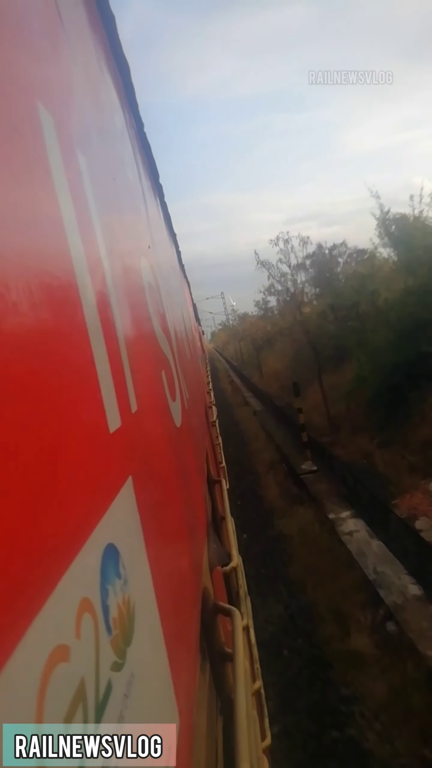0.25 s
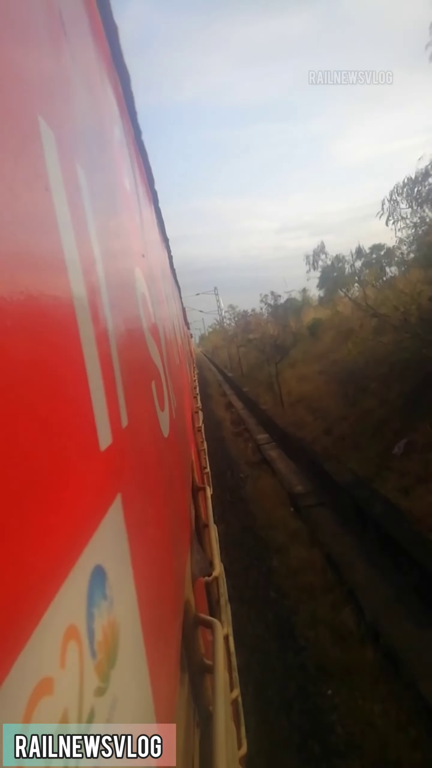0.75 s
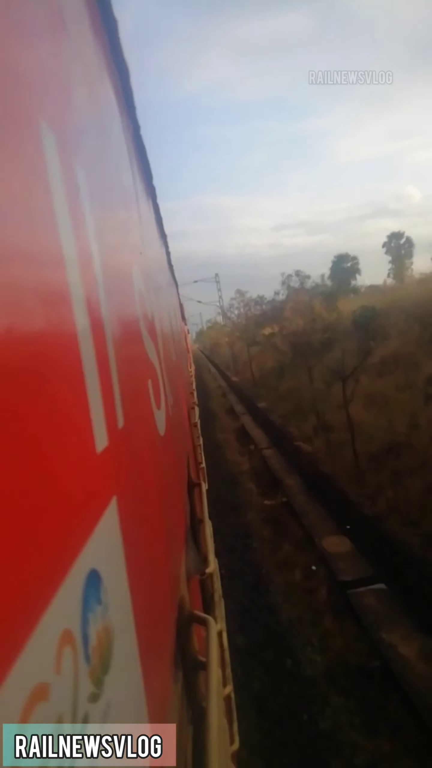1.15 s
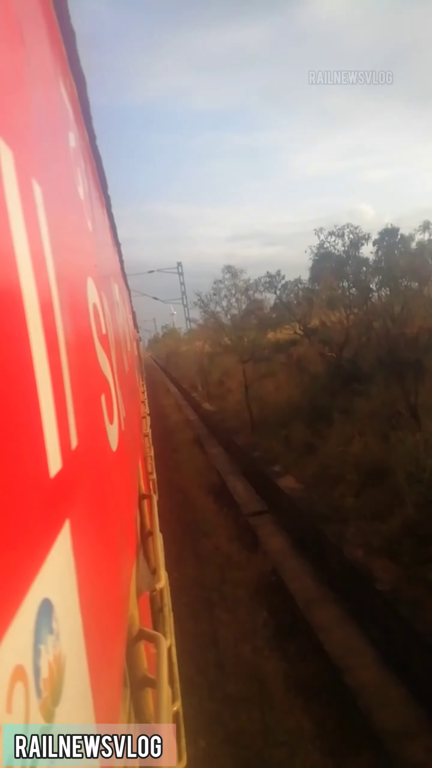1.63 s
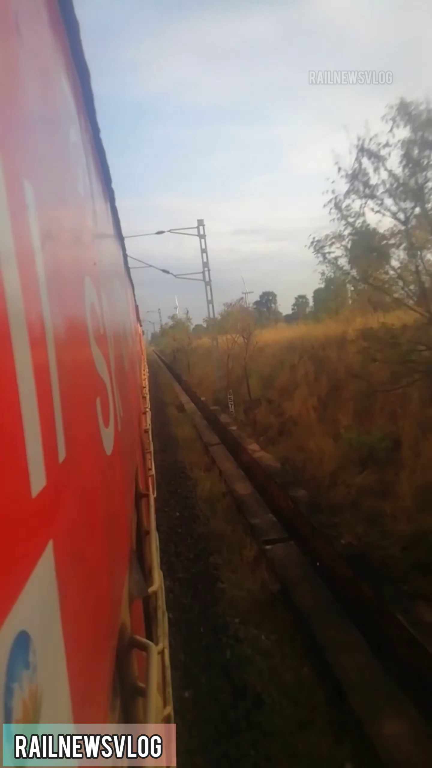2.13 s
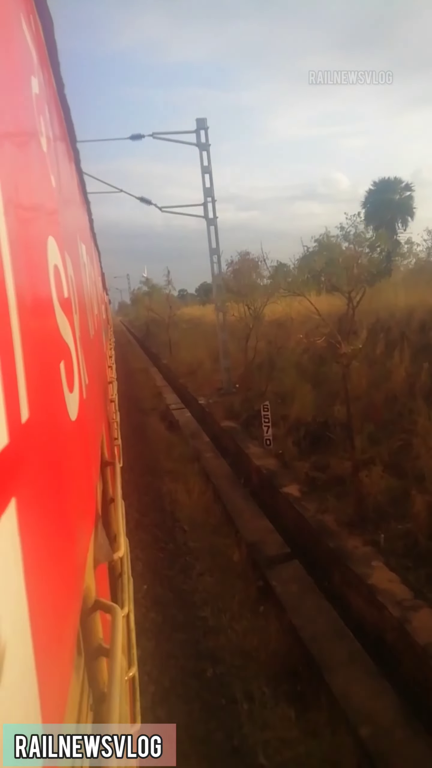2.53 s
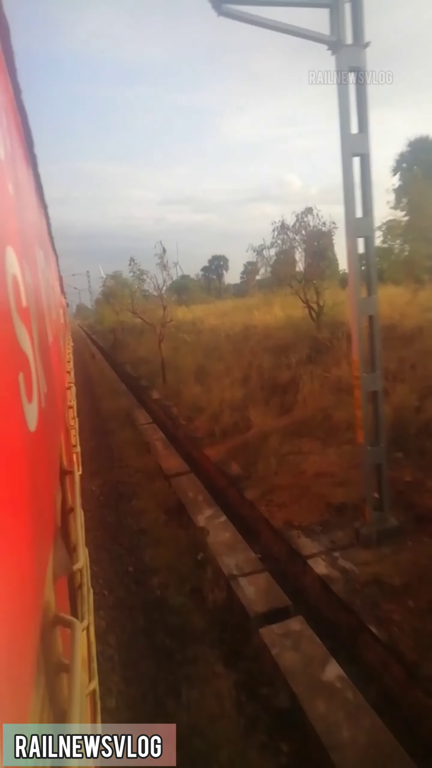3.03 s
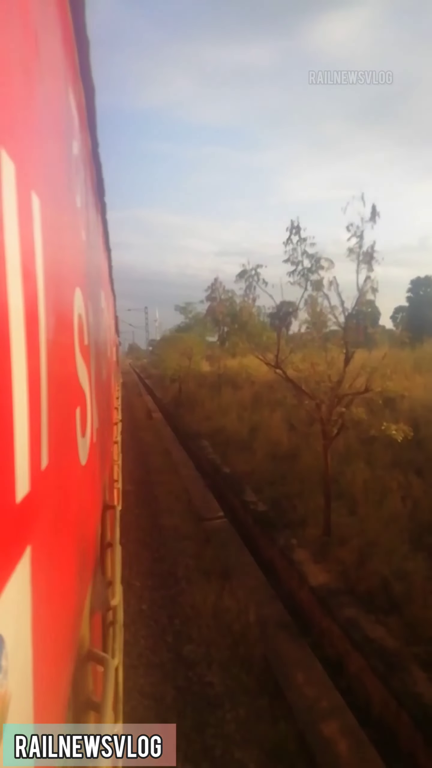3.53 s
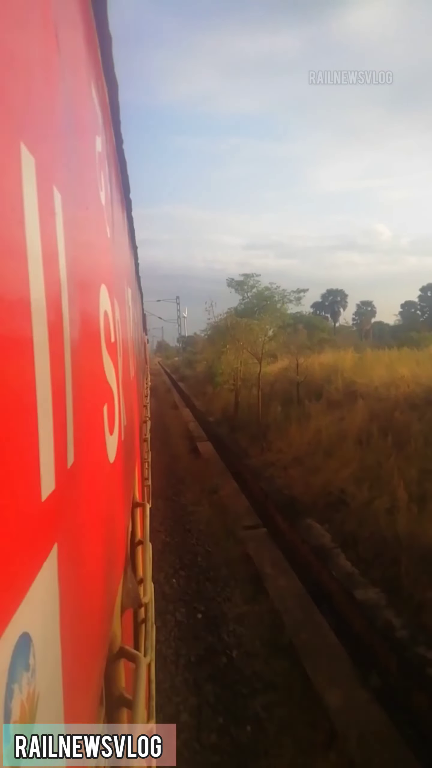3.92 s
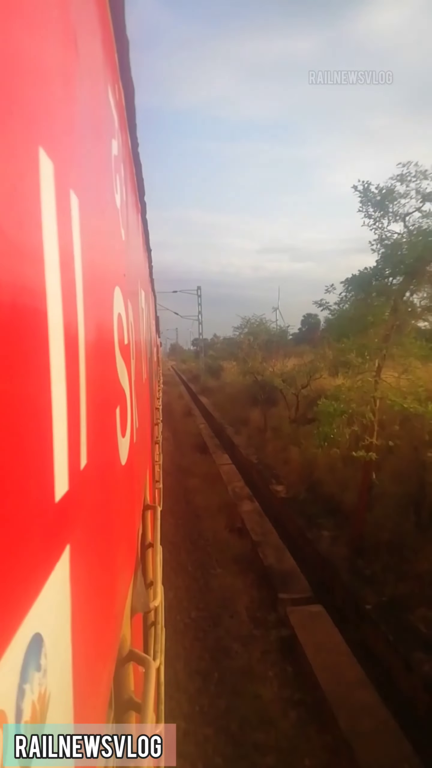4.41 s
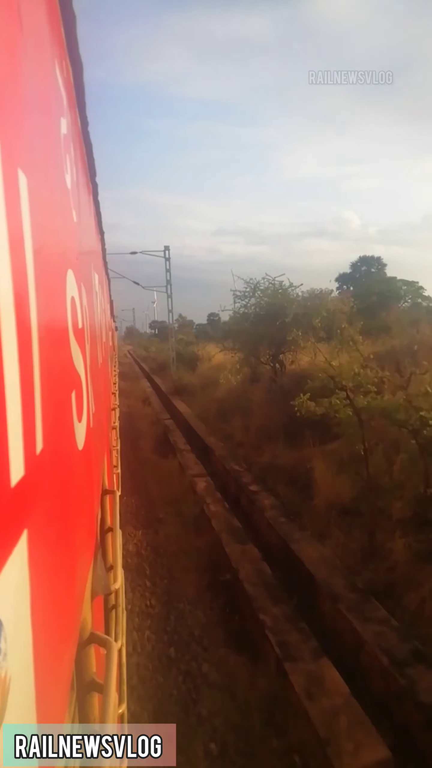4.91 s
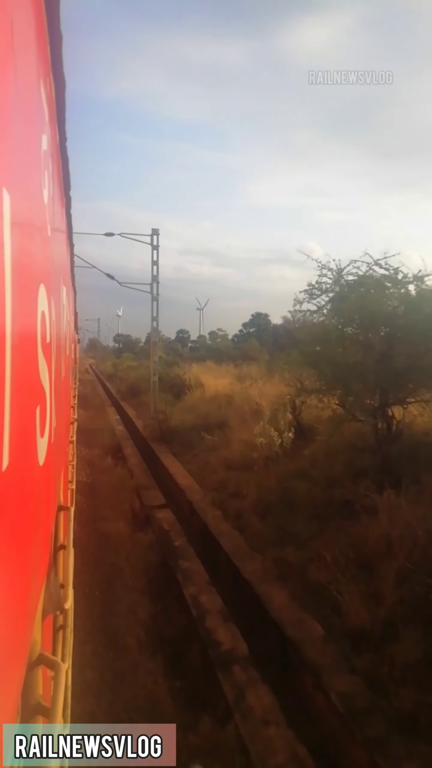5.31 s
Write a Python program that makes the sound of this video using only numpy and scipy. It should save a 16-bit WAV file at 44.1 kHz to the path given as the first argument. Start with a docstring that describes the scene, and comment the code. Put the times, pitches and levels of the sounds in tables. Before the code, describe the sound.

Continuous slipstream noise hits the bare microphone: deep pressure thuds, dense crackling, irregular pops and small treble ticks. It begins left-heavy, with only a dull leak at the right, then turns wide and fuller after a second and a half. Wheel and rail hiss stays thin underneath, dipping and recovering, as the train runs through open country to the end.

```python
"""Wind buffets and crackles at the left, over wheels hissing on the rails: a phone is held out of a train window.
Its right microphone port joins in from about 1.6 s, when the phone turns into the wind.
The wind is shaped noise and random pressure jumps, with slow swings, placed pops and treble snaps on top.
The hiss is shaped noise with a duct whistle at the left. The phone leaks each port, late and dull, into the
other channel and holds the level down with a limiter."""
import sys
import numpy as np
from scipy.fft import rfft, irfft, next_fast_len
from scipy.io import wavfile
from scipy.ndimage import uniform_filter1d, minimum_filter1d, map_coordinates

SR = 44100
rng = np.random.default_rng(int(sys.argv[2]) if len(sys.argv) > 2 else 0)


def wav_out(sig):
    """Save sig, one row per channel (or a flat mono array), as 16-bit PCM at SR to the path in sys.argv[1]."""
    wavfile.write(sys.argv[1], SR, np.round(np.clip(np.atleast_2d(sig).T, -1, 1) * 32767).astype(np.int16))


N = 245195


def amp(db):
    """Gain of a dB value."""
    return 10 ** (np.asarray(db) / 20)


def unit(x):
    """x at rms 1."""
    return x / np.sqrt(np.mean(x ** 2) + 1e-20)


def noise():
    """White noise as long as the scene."""
    return rng.standard_normal(N)


def curves(rows):
    """One value per sample for each column after the time."""
    times, *columns = np.transpose(rows)
    return [np.interp(np.arange(N) / SR, times, column) for column in columns]


def wobble(rate):
    """A smooth random curve with this many knots a second."""
    knots = rng.standard_normal(int(N * rate / SR) + 4)
    return map_coordinates(knots, [np.arange(N) * rate / SR])


def filtered(x, response):
    """x times a complex response of frequency, padded so that the end does not wrap round."""
    m = 2 * next_fast_len(N // 2 + SR // 4)
    return irfft(rfft(x, m) * response(np.fft.rfftfreq(m, 1 / SR)), m)[..., :N]


def coloured(x, spectrum):
    """x through the causal (minimum-phase) filter with this spectrum, so that nothing sounds before a jump."""
    f, db = np.transpose(spectrum)

    def response(hz):
        log_gain = np.interp(np.log(hz + 1), np.log(f + 1), db) * np.log(10) / 20
        cepstrum = irfft(log_gain)
        half = len(cepstrum) // 2
        # fold the mirrored half forward in time
        cepstrum[1:half] *= 2
        cepstrum[half + 1:] = 0
        return np.exp(rfft(cepstrum))
    return filtered(x, response)


def even(x, seconds):
    """x without its own slow level changes, so that a curve alone sets the swells."""
    size = round(seconds * SR)
    power = uniform_filter1d(uniform_filter1d(x ** 2, size=size), size=size // 3)
    return unit(x / np.sqrt(np.abs(power) + 1e-20))


def swells(rows, rise, fall, rounding=1):
    """dB changes that build up to their moment and die away; rounding 1 is pointed, 2 bell-shaped."""
    t = np.arange(0, N + 64, 64) / SR  # a coarse grid is enough
    db = np.zeros(len(t))
    for s, gain, length in rows:
        side = length * np.where(t < s, rise, fall)
        db += gain * np.exp(-(np.abs(t - s) / side) ** rounding)
    return np.interp(np.arange(N) / SR, t, db)


def eddies(rate, spread_db, upward):
    """Random pressure jumps as eddies burst on a port: many small, few large; a share of them push upward."""
    happens, scale, way = rng.random((N, 3)).T
    size = np.minimum(amp(-spread_db * np.log(1 - scale)), 4.5)
    return (happens < rate / SR) * size * np.where(way < upward, 1, -1)


# In all tables split by port, the left port comes first.
# How hard the slipstream bears on each port between puffs, before the layer trims:
# (time [s], buffet level [dB], crackle level [dB])
WIND = [
    [(0, -15, -23), (.5, -16, -25), (.9, -14.5, -26), (1.3, -15.5, -22.5), (1.55, -14, -26.5),
     (1.69, -15, -22.5), (2.1, -17, -26), (2.48, -14.5, -23.5), (2.62, -17.5, -25.5), (3.0, -17, -26.5),
     (3.4, -15.5, -24.5), (3.7, -14, -24.5), (4.1, -19.5, -24.5), (4.3, -13, -20), (4.37, -28, -28),
     (4.45, -15, -26), (4.9, -17.5, -25), (5.2, -12.5, -21.5), (5.56, -17.5, -26.5)],
    [(0, -26, -39), (.46, -26, -40), (1.37, -30, -40), (1.54, -28, -37), (1.6, -13, -31),
     (1.75, -18.5, -19.5), (2.1, -19.5, -17.5), (2.42, -22, -22.5), (2.62, -15, -20.5), (2.9, -15, -25),
     (3.0, -18, -18.5), (3.14, -16, -19), (3.38, -19, -24.5), (3.55, -23.5, -21.5), (3.67, -17, -30),
     (4.13, -16, -27), (4.5, -16, -25.5), (4.86, -23.5, -29), (5.56, -16.5, -24.5)],
]
# Puffs that hit each port: (time [s], crackle change from the steady wind [dB], length [s])
PUFFS = [
    [(0.02, 8, 0.044), (.16, 2, 0.07), (.29, 5, 0.037), (.43, 7.5, 0.023), (.6, 4, 0.068), (.723, 3, 0.013),
     (.77, 5, 0.13), (.973, 2, 0.011), (1.03, 5, 0.018), (1.21, 2.5, 0.012), (1.41, 5.5, 0.026),
     (1.58, 12, 0.021), (1.74, -1, .09), (1.95, 6, 0.049), (2.23, -1, 0.075), (2.36, 1.5, 0.084),
     (2.5, 4, 0.033), (2.67, -2, .05), (3.123, 8, 0.039), (3.28, 4, 0.059), (3.5, 13.5, 0.028),
     (3.56, 0.5, .03), (3.625, 9, 0.017), (3.92, 13, 0.0097), (4.015, 6, 0.022), (4.062, 14.5, 0.031),
     (4.045, 5.5, 0.023), (4.11, 6, 0.011), (4.165, -1, 0.012), (4.57, 14.5, 0.025), (4.71, 4.5, 0.052),
     (4.875, 4, 0.018), (5.06, 1.5, 0.045), (5.17, 2, .015), (5.258, 6, 0.015), (5.3, 9, 0.019),
     (5.42, 6.5, 0.067), (5.52, 4, 0.27)],
    [(1.57, 10, 0.046), (1.9, 5.5, 0.036), (2.03, 7, 0.022), (2.27, 8, 0.022), (2.32, 2.5, 0.04),
     (2.37, 12, 0.031), (2.11, 2, 0.028), (2.18, 4, .015), (2.5, 7, 0.039), (2.57, 7, 0.016),
     (2.74, 7.5, 0.019), (2.87, 5.5, 0.027), (3.193, 4.5, 0.011), (3.275, 14, 0.018), (3.332, 10, 0.008),
     (3.42, 6.5, 0.025), (3.48, 7, 0.04), (3.76, 7.5, 0.061), (3.93, 9, 0.039), (4.06, 9, 0.05),
     (4.2, 9.5, 0.02), (4.325, 6.5, 0.017), (4.42, 6, 0.023), (4.58, 8, 0.023), (4.65, 7, 0.066),
     (4.92, 6, .03), (4.98, 2, 0.048), (5.073, 13, 0.0094), (5.17, 16, 0.0081), (5.26, 8.5, 0.045)],
]
# Brief lulls in which the flow lets go: (time [s], crackle change from the steady wind [dB], length [s])
LULLS = [
    [(.055, -9, 0.02), (.2, -8, 0.022), (.25, -0.5, 0.018), (.354, -5, 0.021), (.39, -4, 0.017),
     (.913, -3.5, 0.027), (1.132, -2, .01), (1.237, -18, 0.013), (1.307, -7, 0.024), (1.696, -12, .025),
     (1.93, -6, 0.023), (2.205, -9, 0.028), (2.345, -7, 0.011), (2.434, -5, .015), (2.624, -8, .03),
     (2.893, -11, .015), (3.223, -9, 0.023), (3.377, -1, 0.013), (3.9, -4, .015), (3.96, -12, 0.018),
     (3.986, -12, 0.011), (4.088, -7, 0.016), (4.13, -7, 0.023), (4.844, -9, 0.023), (5.19, -7, .02),
     (5.368, -9, .02)],
    [(1.69, -16, 0.024), (1.876, -6, 0.013), (1.94, -9, 0.043), (2.205, -7, 0.026), (2.434, -6, 0.017),
     (2.624, -11, 0.01), (2.913, -5, 0.017), (3.073, -9, 0.0095), (3.253, -7, 0.037), (3.382, -5, 0.022),
     (3.452, -22, 0.022), (3.672, -6, .025), (4.085, -5, .015), (4.136, -9, 0.023), (4.265, -4, .015),
     (4.37, -17, 0.018), (5.093, -7, .012), (5.368, -5, 0.033)],
]
# Tone of the low buffeting at each port: (frequency [Hz], gain [dB])
BUFFET = [
    [(50, -31.5), (110, 1.5), (200, -1.5), (400, -8), (800, -21.5), (1500, -62.5)],
    [(40, -19.5), (110, -5), (250, 0), (400, -5.5), (800, -15), (1500, -59)],
]
# Tone of the crackle at each port: (frequency [Hz], gain [dB])
CRACKLE = [
    [(20, -43), (200, -2), (500, 2.5), (1200, -5.5), (2000, -9.5), (3000, -13), (4000, -23), (5500, -25.5),
     (7500, -60), (10000, -77), (16000, -89)],
    [(20, -57.5), (200, -2.5), (500, 2.5), (1200, -2.5), (2000, -9), (3000, -16.5), (4000, -26.5),
     (5500, -25.5), (8000, -34), (10000, -92), (16000, -100)],
]
BUFFET_SHARE = 0.39  # buffet dB gained per crackle dB in a puff or lull


def port_wind(port, upward, roar, choppy):
    """Buffeting and crackle on one port: small eddies burst sharply, large ones are smeared over 0.4 ms."""
    buffet_db, crackle_db = curves(WIND[port])
    puff_db = swells(PUFFS[port], rise=0.69, fall=0.56) + swells(LULLS[port], rise=0.57, fall=0.44)
    buffet_db = buffet_db + BUFFET_SHARE * puff_db
    crackle_db = crackle_db + puff_db
    flutter = choppy * wobble(45)  # shared, so that all layers gust together

    buffet = amp(1.55 * flutter + 2.6 * wobble(18)) * coloured(noise(), BUFFET[port])
    buffet = even(buffet, 0.11)

    small = amp(2.7 * flutter + 2.7 * wobble(110)) * eddies(1300, spread_db=4, upward=upward)
    large = amp(2 * flutter) * uniform_filter1d(eddies(450, spread_db=3.5, upward=upward), size=17)
    rush = amp(3.2 * flutter + 4.1 * choppy * wobble(160)) * noise()
    crackle = unit(small) + 0.57 * unit(large) + roar * unit(rush)
    crackle = even(coloured(crackle, CRACKLE[port]), 0.034)
    return amp(buffet_db + 0.67) * buffet + amp(crackle_db + 3.5) * crackle


def slipstream():
    """Steady wind: choppy and spiky on the left port, more of an even roar on the right."""
    left = port_wind(0, upward=.75, roar=0.43, choppy=1.7)
    right = port_wind(1, upward=.55, roar=0.72, choppy=0.91)
    return np.array([left, right])


# Slow pressure swings between surges, as heard at the left port: (time [s], level [dB])
HEAVE = [(0, -20), (.7, -18), (1.2, -17.5), (1.7, -20.5), (2.1, -21.5), (3.4, -20.5), (4.4, -24),
         (5.56, -20)]
# Surges of the swings: (time [s], change from the steady swings [dB], length [s])
SURGES = [(.11, 8, 0.037), (.335, 10, 0.13), (.55, 7, 0.067), (.8, 5, 0.038), (1.05, 4, 0.057),
          (1.35, 7, 0.12), (1.56, 3, 0.059), (1.73, 9.5, 0.055), (2.0, 4, 0.027), (2.2, 7, 0.13),
          (2.53, 8.5, 0.14), (2.86, 5.5, 0.13), (3.05, 7, 0.041), (3.48, 9.5, 0.16), (3.77, 9, 0.036),
          (3.98, 5, 0.02), (4.26, 10.5, 0.19), (4.55, 7.5, 0.089), (4.75, 9.5, 0.034), (4.85, 9, 0.031),
          (5.0, 13, 0.16), (5.25, 7.5, 0.033), (5.46, 7.5, 0.087)]
# Moments when nearly all the swings slacken: (time [s], change from the steady swings [dB], length [s])
SLACKS = [(.2, -7, 0.036), (.45, -12, 0.035), (.65, -7, .03), (1.12, -7, 0.031), (1.27, -14, 0.045),
          (1.48, -2, 0.015), (1.53, -14, .015), (1.69, -7, 0.017), (2.58, -14, 0.027), (3.9, -8, 0.028),
          (4.37, -6, 0.029), (4.8, -4, .02), (5.35, 0.5, .025)]
# Tone of the swings: (frequency [Hz], gain [dB])
SWINGS = [(10, -82), (25, -1.5), (50, 8), (100, 5), (160, -2), (300, -60.5)]


def pressure_swings():
    """Deep slow swings of air pressure: separate low noise at each port under one level curve."""
    swings = np.array([even(coloured(noise(), SWINGS), 0.044) for port in (0, 1)])
    surge_db = swells(SURGES, rise=0.97, fall=0.74, rounding=1.1)
    slack_db = swells(SLACKS, rise=1.0, fall=0.6)
    heave_db = curves(HEAVE)[0] + surge_db + slack_db + 1.64 * wobble(24.96)
    return amp(heave_db + [[0], [-9]]) * swings  # the right port 9 dB weaker


# Level of the wheel and rail hiss as the phone records it, stepping down abruptly and recovering where
# its gain control ducks, before each port's trim: (time [s], hiss level [dB], high hiss level [dB])
RUNNING = [(0, -41.5, -50), (.2, -45.5, -52), (.43, -45, -52), (.46, -51, -57), (.73, -43.5, -53),
           (.81, -45, -55), (.85, -43, -42.5), (.99, -39, -40), (1.04, -44.5, -48.5), (1.13, -41.5, -46),
           (1.21, -37, -42), (1.23, -47, -53), (1.54, -39.5, -46), (1.72, -44.5, -52), (1.78, -46.5, -55),
           (2.1, -44.5, -52), (2.5, -48, -53), (2.63, -46, -57), (2.84, -43.5, -50), (3.36, -45, -58),
           (3.58, -36, -51), (3.81, -42.5, -52), (4.06, -40, -47), (4.08, -45.5, -55), (4.36, -45, -54),
           (4.43, -33.5, -48), (4.46, -41.5, -50), (4.7, -41.5, -50.5), (4.97, -41, -49), (5.1, -44, -54),
           (5.56, -42.5, -51)]
# Tone of the hiss through each port's duct: (frequency [Hz], gain [dB])
HISS = [
    [(600, -35), (1600, 15), (3000, 7.5), (4000, 0.5), (5500, -2), (7000, -5.5), (7800, -38), (9000, -65)],
    [(600, -19), (1600, 13.5), (2400, 4), (3000, 5), (4000, -1.5), (6800, -0.5), (8000, -6.5), (9200, -16),
     (9900, -13), (11000, -21)],
]
# Tone of the high hiss through each port's duct: (frequency [Hz], gain [dB])
HIGH_HISS = [
    [(7500, -36), (9200, -2), (9900, 1.5), (10700, -2), (13500, 2.5), (15000, 3), (15700, -4)],
    [(8500, -18), (10700, -10), (13500, -18), (15000, -11), (15700, -20)],
]
# The left port's duct resonance: (frequency [Hz], gain [dB])
WHISTLE = [(13200, -30), (14300, -6), (15000, 0), (15700, -12)]
WHISTLE_DB, WHISTLE_FOLLOWS = -53, 0.66  # mean level, dB gained per dB of high hiss


def running_noise():
    """Wheel and rail hiss: unrelated noise at the two ports, coloured by each port's duct."""
    hiss_db, high_db = curves(RUNNING)
    flutter = 1.86 * wobble(21.98) + 0.38 * wobble(3.8)
    hiss = [unit(coloured(noise(), spectrum)) for spectrum in HISS]
    high = [unit(coloured(noise(), spectrum)) for spectrum in HIGH_HISS]
    whistle_db = WHISTLE_DB + WHISTLE_FOLLOWS * (high_db - high_db.mean()) + flutter
    whistle = amp(whistle_db) * unit(coloured(noise(), WHISTLE)) * [[1], [0]]  # left only
    hiss = amp(hiss_db + flutter + [[5], [6]]) * hiss
    high = amp(high_db + flutter + [[-2], [-8.5]]) * high
    return hiss + high + whistle


# The sharpest pressure jumps on each port, pulls negative:
# (time [s], size before recoil and limiter [full scale], half-width, played as at least 0.06 [ms])
POPS = [
    [(0.0059, -0.96, 0.07), (0.0198, 0.91, 0.066), (0.0259, -1, 0.3), (0.0384, -0.61, 0.17),
     (0.0669, 0.81, 0.33), (0.0911, -0.51, 0.17), (0.123, -0.93, 0.059), (0.1486, 0.94, 0.11),
     (0.1672, 0.65, 0.16), (0.1866, -0.32, 0.077), (0.2267, 0.42, 0.096), (0.2717, -0.7, 0.093),
     (0.287, 0.32, 0.07), (0.2931, 0.54, 0.13), (0.306, 0.91, 0.33), (0.3659, -0.52, 0.082),
     (0.4172, -0.89, 0.27), (0.4324, -0.56, 0.081), (0.4548, 0.83, 0.096), (0.5614, -0.38, 0.065),
     (0.5827, 0.63, 0.12), (0.592, -0.39, 0.07), (0.6057, 0.66, 0.07), (0.6324, 0.78, 0.083),
     (0.661, 0.42, 0.079), (0.7187, 0.65, 0.13), (0.7584, 0.83, 0.33), (0.7648, 0.59, 0.076),
     (0.7791, 0.66, 0.12), (0.7971, -0.8, 0.41), (0.803, 0.59, 0.08), (0.8213, 0.34, 0.07),
     (0.8309, -0.71, 0.22), (0.9715, 0.5, 0.075), (1.0371, -0.6, 0.17), (1.226, 1, 0.13),
     (1.2591, -0.81, 0.15), (1.2716, 0.7, 0.095), (1.2831, -0.28, 0.07), (1.3221, 0.76, 0.24),
     (1.3512, -1.04, 0.17), (1.4062, 0.63, 0.14), (1.4675, -0.47, 0.094), (1.5066, -0.62, 0.26),
     (1.5648, -0.58, 0.12), (1.581, 0.84, 0.24), (1.5881, 0.69, 0.24), (1.6171, -0.64, 0.12),
     (1.7284, 0.78, 0.12), (1.7618, 0.72, 0.24), (1.7972, 0.6, 0.07), (1.821, -0.61, 0.17),
     (1.8617, 0.6, 0.12), (2.2215, 0.49, 0.12), (2.3597, -0.81, 0.22), (2.5049, 0.83, 0.066),
     (2.5229, 0.76, 0.12), (2.6667, 0.66, 0.17), (2.9391, -0.52, 0.07), (3.0824, -0.45, 0.12),
     (3.1048, -0.39, 0.14), (3.1222, 0.9, 0.13), (3.2854, -1.3, 0.07), (3.4151, 0.22, 0.07),
     (3.4691, -0.78, 0.17), (3.4979, 0.79, 0.08), (3.5068, 0.57, 0.07), (3.5269, -0.74, 0.064),
     (3.62, 0.37, 0.06), (3.8739, -0.75, 0.09), (3.9178, -1.04, 0.17), (3.9289, 0.69, 0.12),
     (3.9727, 0.66, 0.19), (4.05, -1.13, 0.2), (4.0663, 0.85, 0.21), (4.0762, 0.87, 0.14),
     (4.1611, -0.51, 0.12), (4.2504, 0.47, 0.15), (4.2827, 1, 0.41), (4.3365, -0.65, 0.14),
     (4.4383, -1.08, 0.33), (4.4959, 0.48, 0.091), (4.5289, 0.67, 0.17), (4.5703, -1, 0.08),
     (4.6075, 0.7, 0.11), (4.757, 0.88, 0.33), (4.858, 0.87, 0.24), (4.8744, 0.61, 0.15),
     (5.0147, -0.62, 0.14), (5.0592, 0.69, 0.12), (5.2278, 0.37, 0.07), (5.2937, 0.57, 0.14),
     (5.3234, -0.36, 0.07), (5.3839, 0.69, 0.12), (5.4761, 1.09, 0.38), (5.5149, 1.2, 0.21),
     (5.5211, -0.73, 0.089)],
    [(1.5739, 0.44, 0.12), (1.711, -0.62, 0.18), (1.7604, -0.57, 0.073), (1.7815, -0.96, 0.24),
     (1.7899, 1, 0.088), (1.8364, -0.78, 0.13), (1.8964, 0.73, 0.052), (2.0291, -1.17, 0.12),
     (2.1326, -0.98, 0.17), (2.1636, -0.4, 0.068), (2.1853, 0.51, 0.12), (2.2435, 0.53, 0.12),
     (2.2509, 0.52, 0.14), (2.2679, -1.1, 0.083), (2.3337, -1.3, 0.22), (2.365, 1.01, 0.13),
     (2.384, 0.78, 0.22), (2.3928, 0.83, 0.14), (2.4622, -0.61, 0.2), (2.4888, -1.09, 0.26),
     (2.5071, -1.12, 0.11), (2.5202, 0.85, 0.084), (2.5772, 0.77, 0.24), (2.6696, 1, 0.13),
     (2.7287, -1.1, 0.26), (2.87, 1.5, 0.08), (2.9494, -0.94, 0.17), (3.015, 1.1, 0.17),
     (3.0974, -0.18, 0.14), (3.1091, 1.3, 0.24), (3.1494, -0.44, 0.05), (3.1923, -0.61, 0.11),
     (3.199, 0.47, 0.15), (3.2717, -0.79, 0.2), (3.3031, -0.61, 0.05), (3.3372, -0.61, 0.1),
     (3.4217, 0.51, 0.068), (3.4684, -0.79, 0.17), (3.4812, 1.08, 0.18), (3.5197, -1.5, 0.29),
     (3.586, -1.4, 0.33), (3.6344, 0.96, 0.24), (3.754, -1.12, 0.19), (3.7776, 0.56, 0.094),
     (3.8097, -0.99, 0.24), (3.9185, -0.37, 0.15), (4.1667, -0.57, 0.19), (4.652, -0.72, 0.2),
     (4.9784, 0.94, 0.11), (5.3092, -1.06, 0.17), (5.4554, -0.67, 0.24), (5.4946, -1.17, 0.24)],
]
# Tone of the fizz that trails a jump: (frequency [Hz], gain [dB])
SPRAY = [(600, -18), (1500, 0), (3200, -2), (4500, -12), (7000, -20.5), (10000, -57)]
RECOIL, RECOIL_WIDER = 0.17, 5.6  # the opposite swing: share of the jump's size, times its half-width
SPRAY_DB, SPRAY_MS = -7.5, 1.28  # fizz gain before its tone filter, decay time
SPRAY_WIDTH_MS = .08  # wider jumps fizz less


def pops():
    """Each jump is a smooth push or pull inside a weaker, wider recoil, trailed by a short noise fizz."""
    push, fizz = np.zeros((2, N + 400)), np.zeros((2, N + 400))
    ms = (np.arange(400) - 100) * 1000 / SR  # the jump peaks 100 samples in
    for port, rows in enumerate(POPS):
        for s, size, width_ms in rows:
            start = round(s * SR)
            u = ms / max(width_ms, .06)
            recoil = RECOIL * np.exp(-(u / RECOIL_WIDER) ** 2 / 2)
            push[port, start:start + 400] += size * (np.exp(-u ** 2 / 2) - recoil)
            sharpness = SPRAY_WIDTH_MS / max(width_ms, SPRAY_WIDTH_MS)
            decay = (ms > 0) * np.exp(-ms / SPRAY_MS)
            fizz[port, start:start + 400] += size * sharpness * decay * rng.standard_normal(400)
    spray = np.pad(coloured(fizz[:, :N], SPRAY), ((0, 0), (0, 400)))
    return (push + amp(SPRAY_DB) * spray)[:, 100:N + 100]


# Jumps that overload each port and snap up into the treble: (time [s], level before the tone filter [dB])
SNAPS = [
    [(.122, -52), (.288, -52), (.433, -54), (.561, -57), (.606, -57), (.632, -59), (.659, -59),
     (1.283, -56), (1.765, -45), (2.112, -55), (2.504, -56), (2.939, -53), (3.197, -52), (3.285, -48),
     (3.416, -54), (3.527, -48), (3.874, -55), (4.053, -55), (4.432, -52), (4.571, -50), (4.756, -53),
     (4.901, -52.5), (5.228, -53), (5.301, -54), (5.322, -47)],
    [(1.74, -56), (1.896, -46), (1.915, -51), (2.049, -56), (2.181, -51), (2.269, -30), (2.868, -43),
     (3.149, -56), (3.284, -48)],
]
# Tone of the snaps: (frequency [Hz], gain [dB])
SNAP = [(2500, -10), (4500, 33), (8500, 32.5), (16000, 13)]


def snaps():
    """Ragged treble ticks: noise bursts that fall 60 dB in 3 ms, before the tone filter."""
    snap, t = np.zeros((2, N + 400)), np.arange(400) / SR
    for port, rows in enumerate(SNAPS):
        for s, db in rows:
            start = round(s * SR)
            ragged = rng.standard_normal(400) * amp(-60 * t / .003)
            snap[port, start:start + 400] += amp(db) * ragged / np.linalg.norm(ragged)
    return coloured(snap[:, :N], SNAP)


def scene():
    """Wind, its swings, pops and snaps over running noise."""
    return slipstream() + pressure_swings() + running_noise() + pops() + snaps()


def record(dry):
    """Each port reaches the other channel 0.56 ms late and low-passed; limiter, soft clip, band limit."""
    def leak(hz):
        late = np.exp(-2j * np.pi * hz * 0.00056)
        return 0.93 * late / (1 + 1j * hz / 350) / (1 + (hz / 2500) ** 4)

    x = dry + filtered(dry[::-1], leak)
    # one limiter gain for both channels: hold the lowest gain needed nearby, then smooth it
    needed = np.minimum(1, 1.05 / (np.abs(x).max(axis=0) + 1e-9))
    held = minimum_filter1d(needed, size=401)
    x = x * uniform_filter1d(uniform_filter1d(held, size=201), size=151)
    x = x / (1 + np.abs(x) ** 16) ** (1 / 16)  # soft clip just under full scale
    return filtered(x, lambda hz: hz < 15850)


dry = scene()
out = record(dry)
wav_out(out)
```